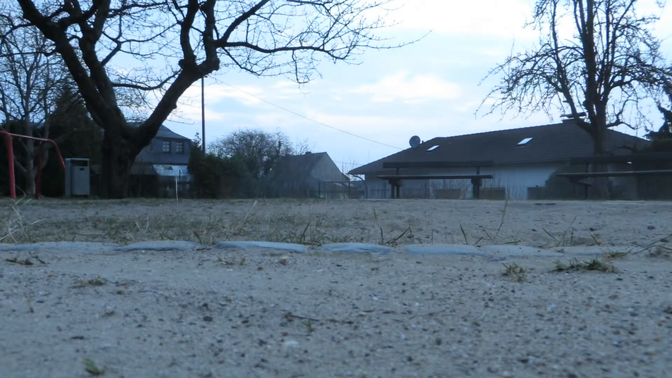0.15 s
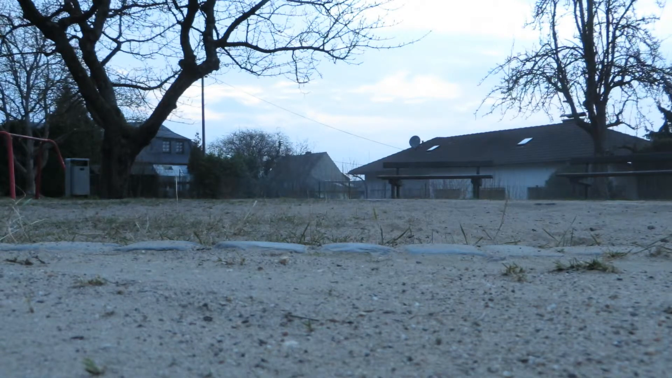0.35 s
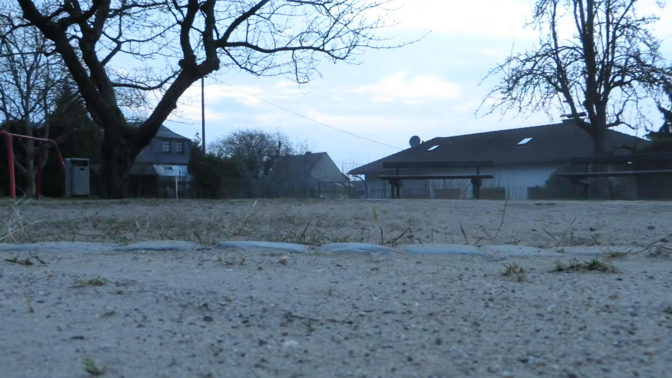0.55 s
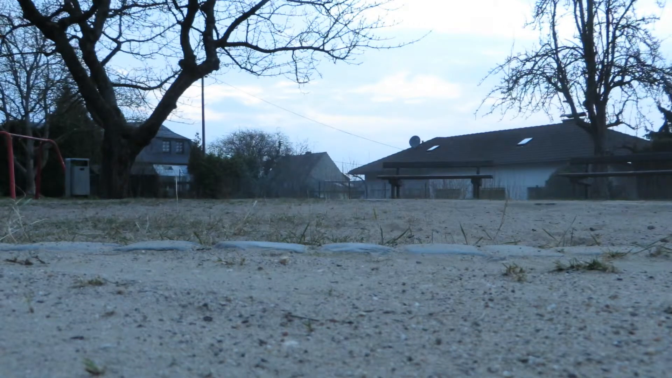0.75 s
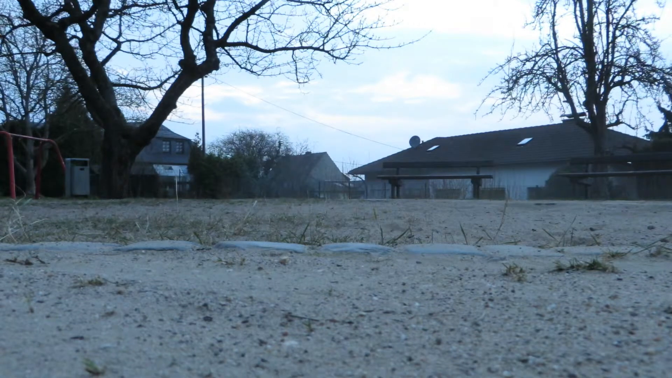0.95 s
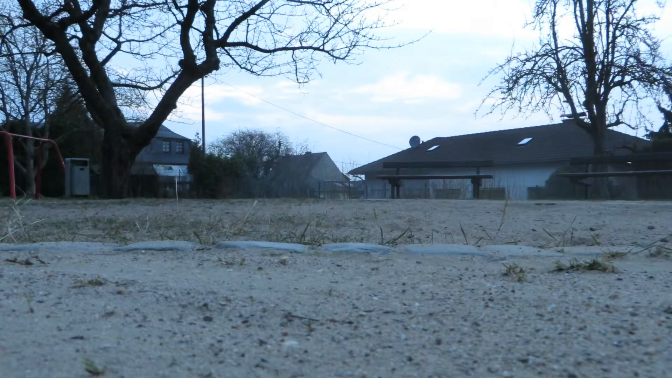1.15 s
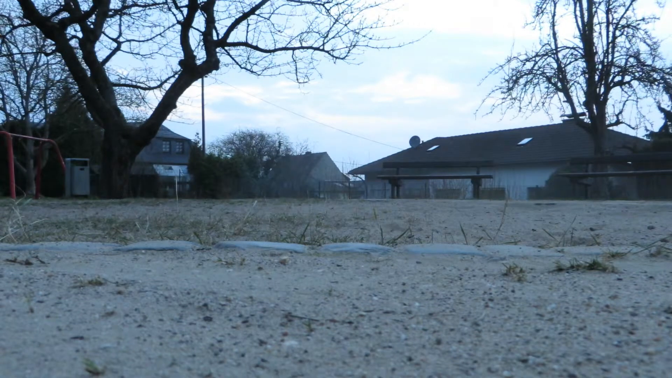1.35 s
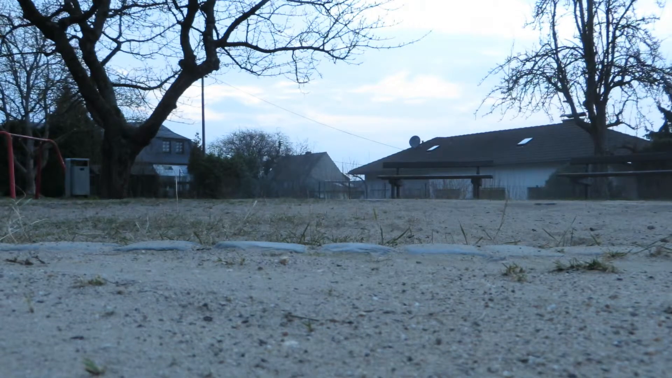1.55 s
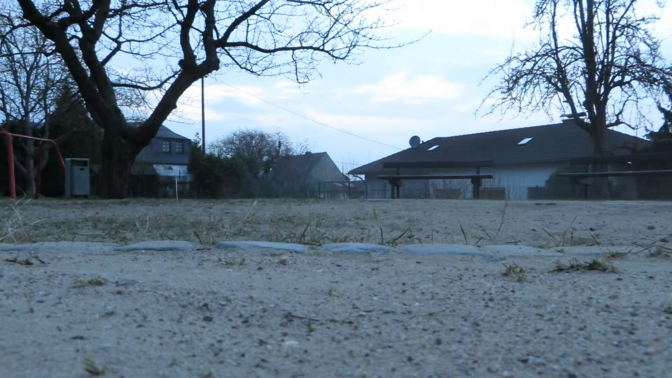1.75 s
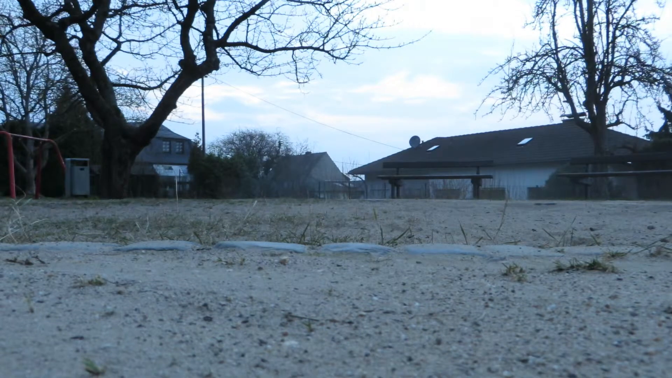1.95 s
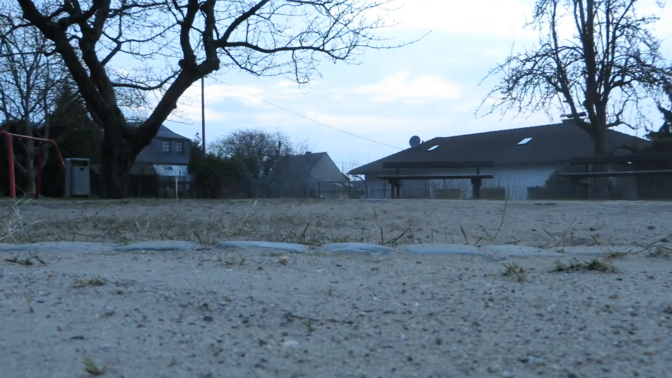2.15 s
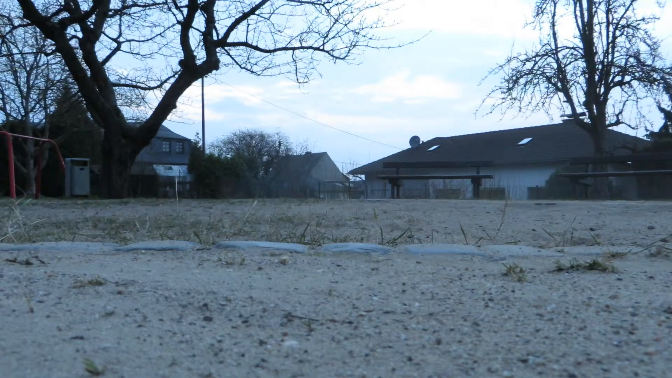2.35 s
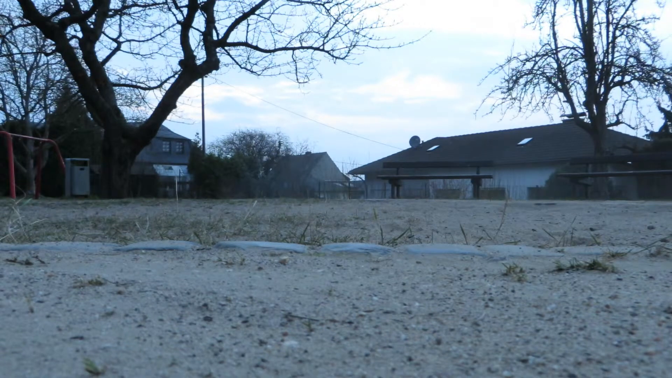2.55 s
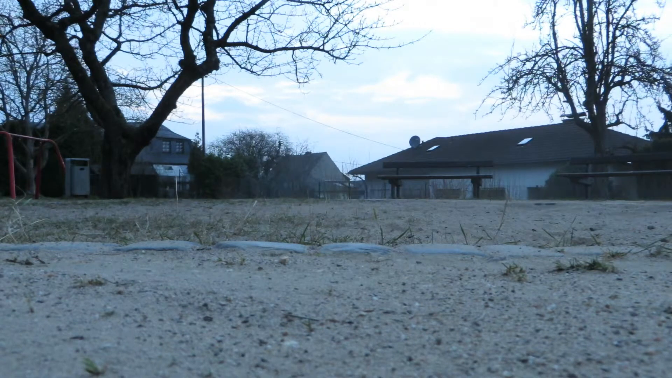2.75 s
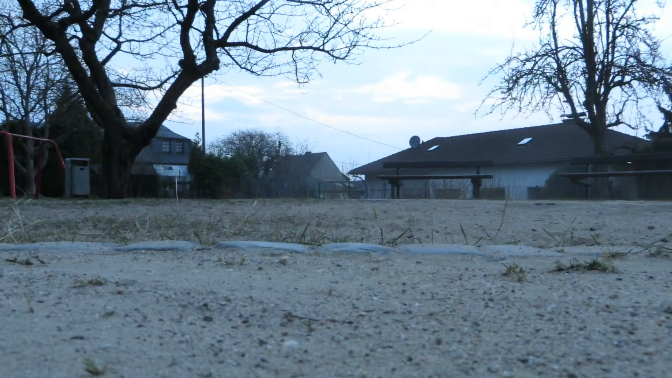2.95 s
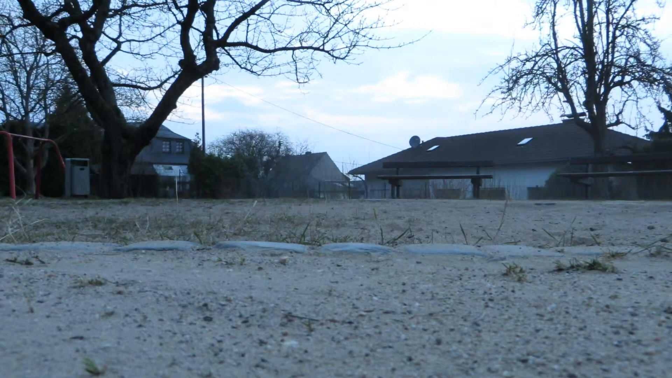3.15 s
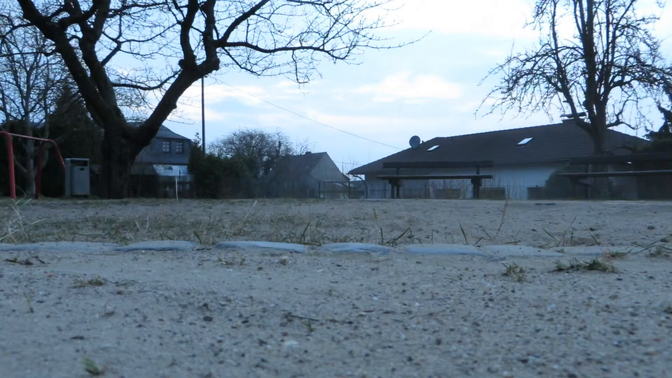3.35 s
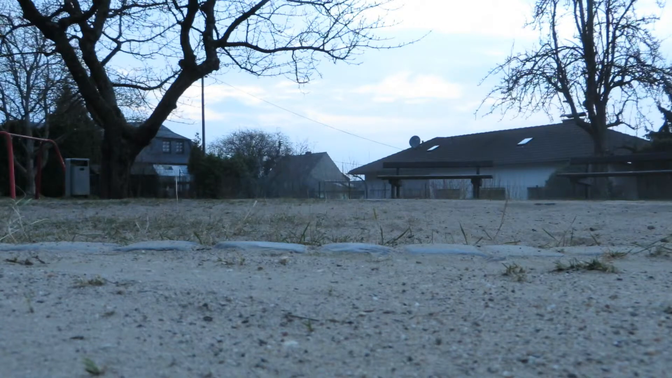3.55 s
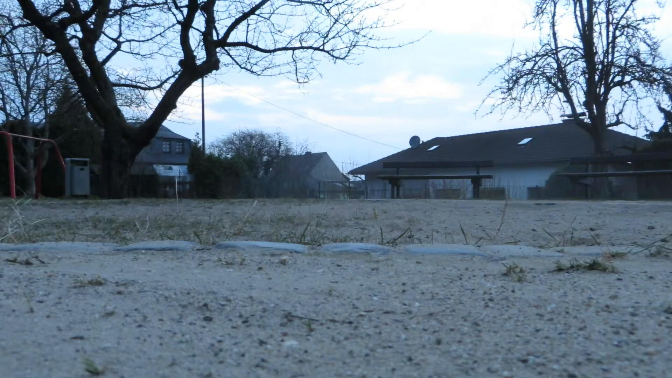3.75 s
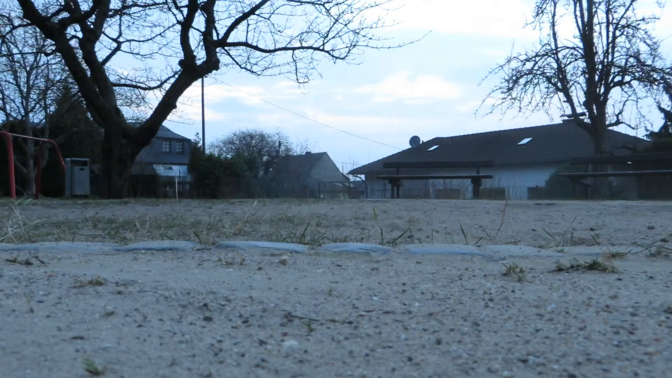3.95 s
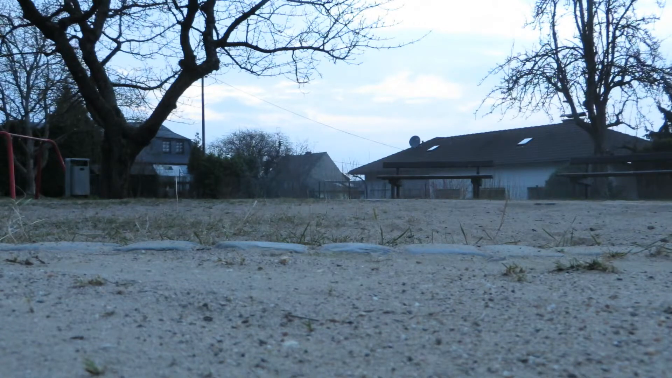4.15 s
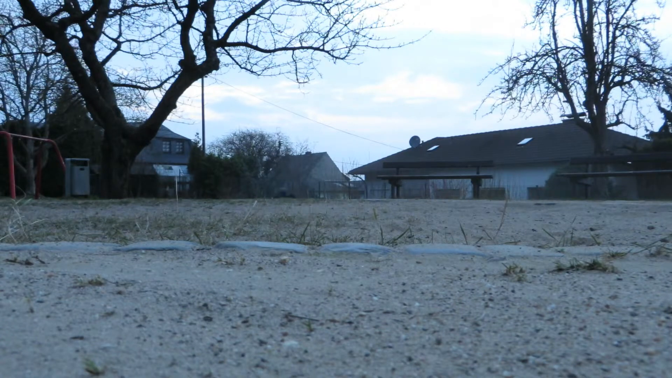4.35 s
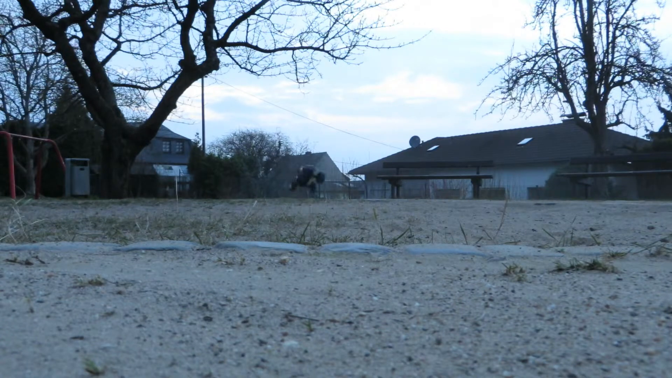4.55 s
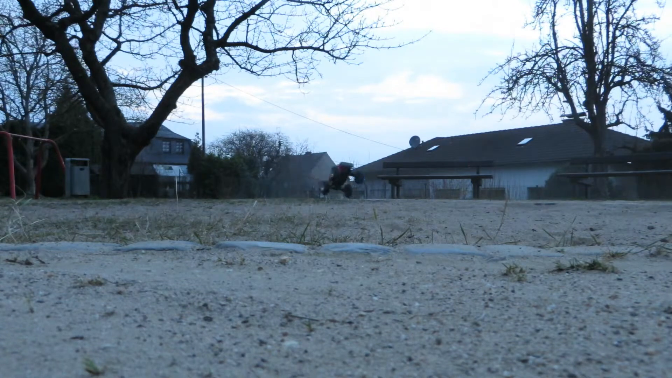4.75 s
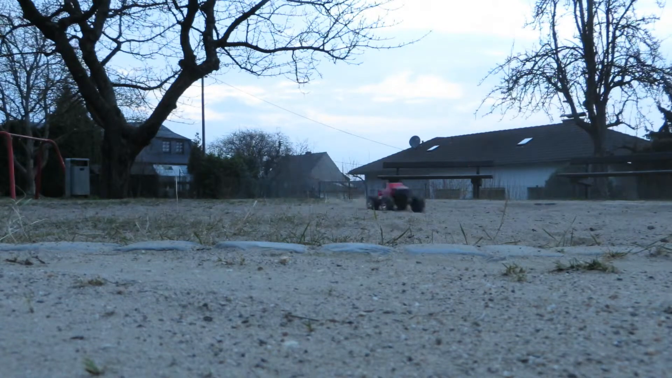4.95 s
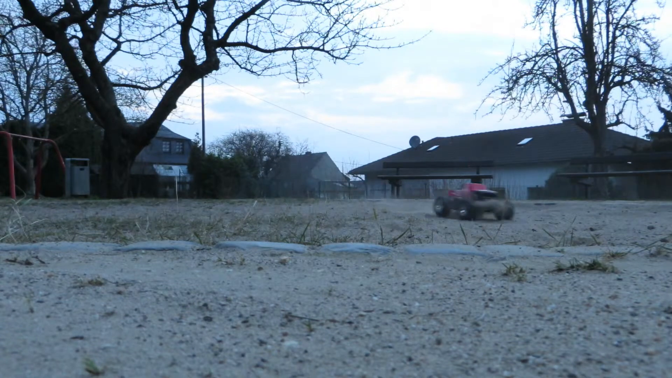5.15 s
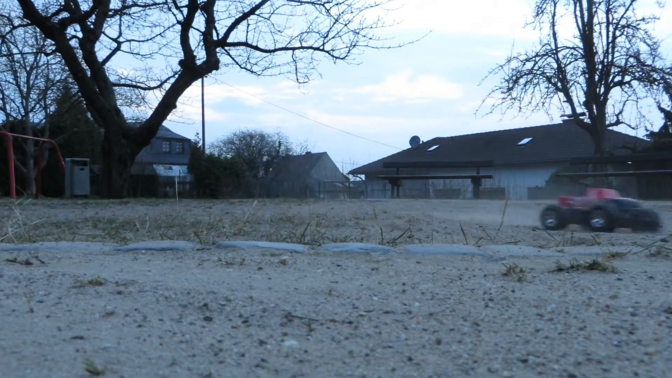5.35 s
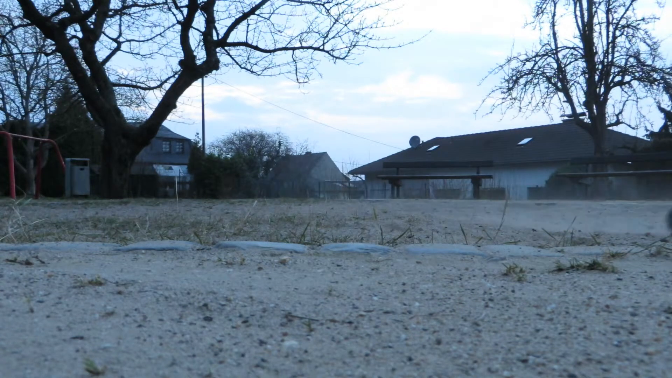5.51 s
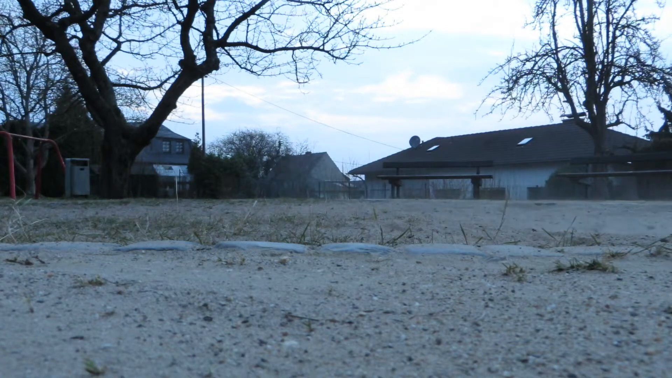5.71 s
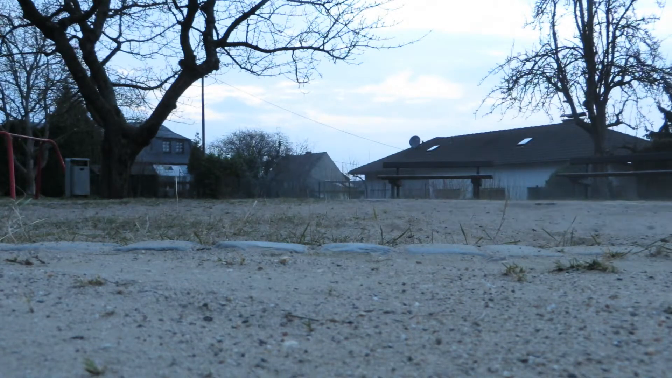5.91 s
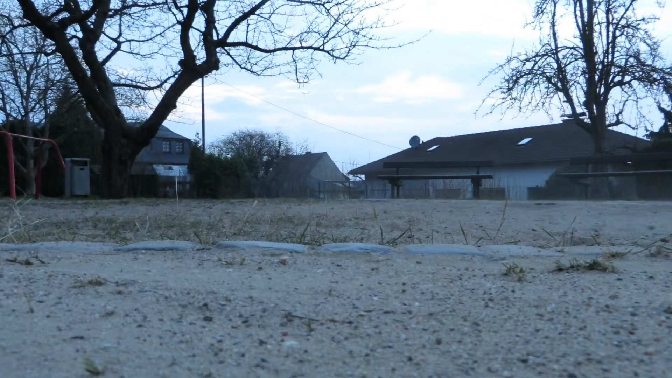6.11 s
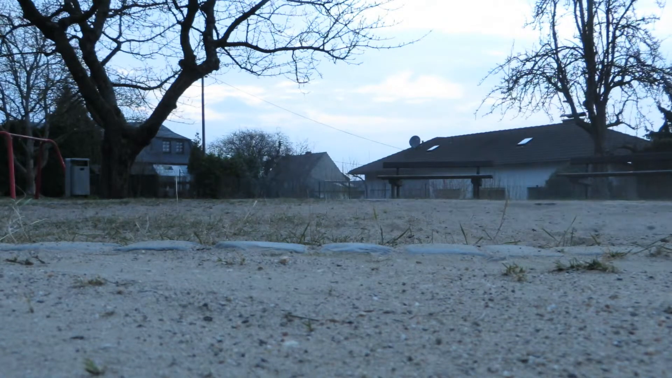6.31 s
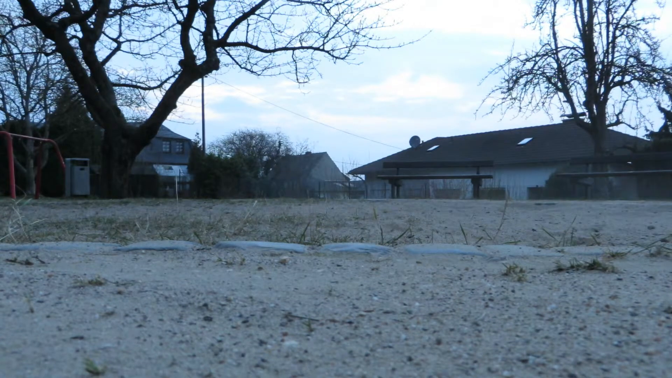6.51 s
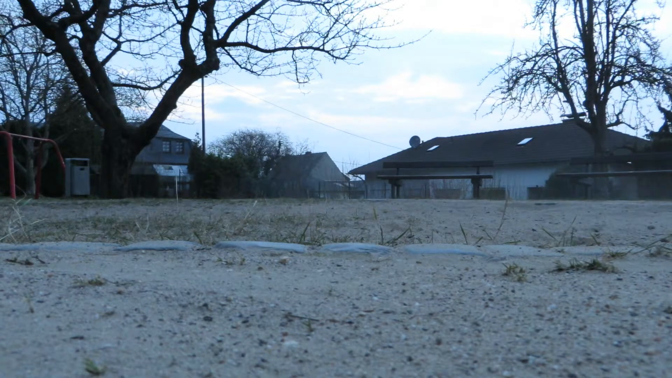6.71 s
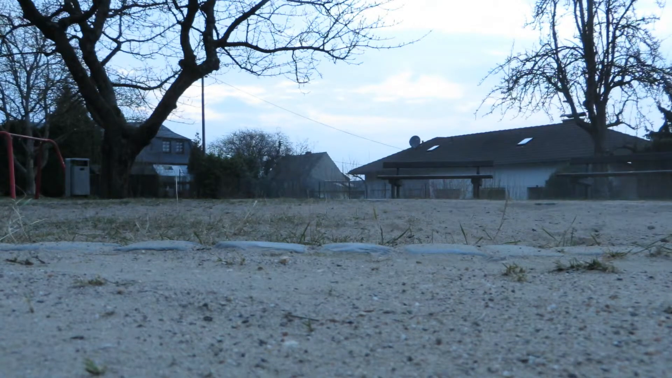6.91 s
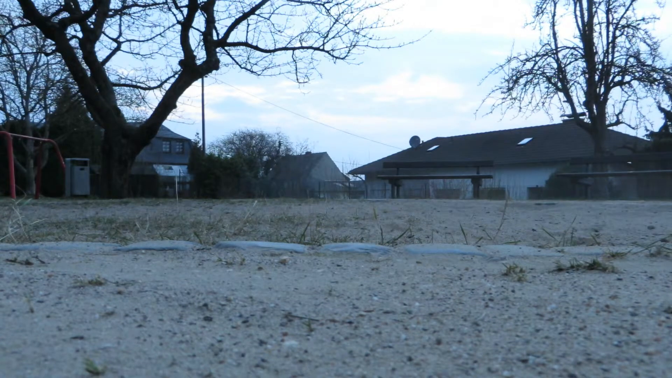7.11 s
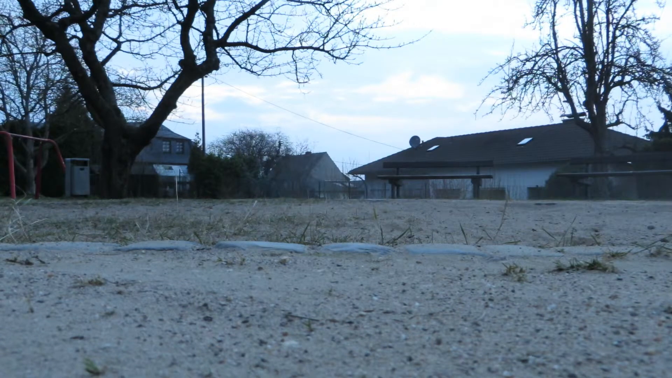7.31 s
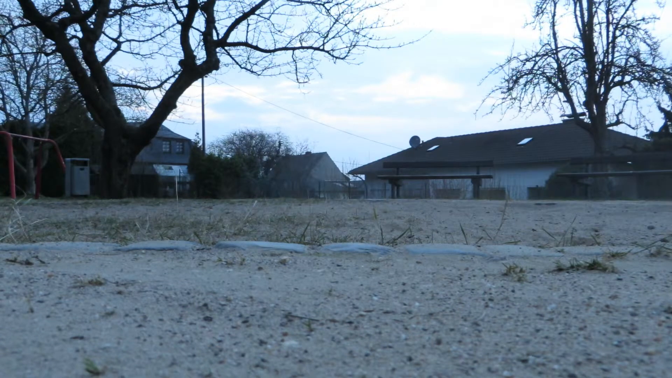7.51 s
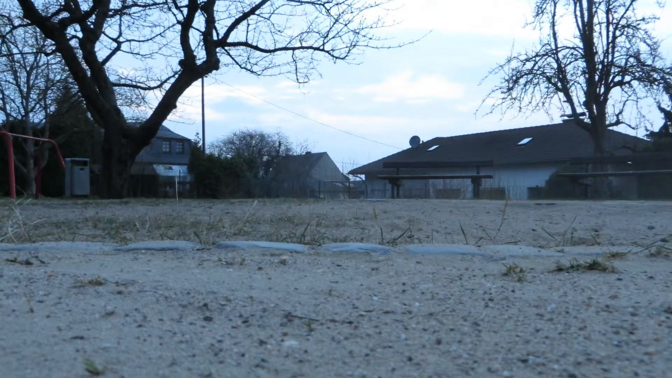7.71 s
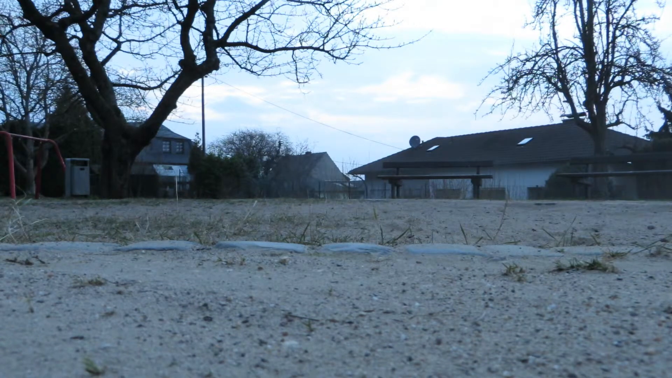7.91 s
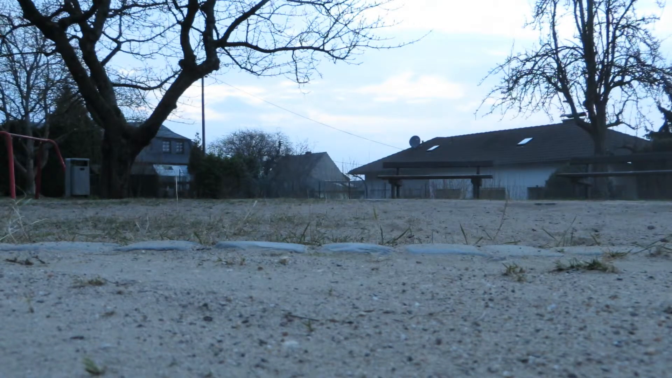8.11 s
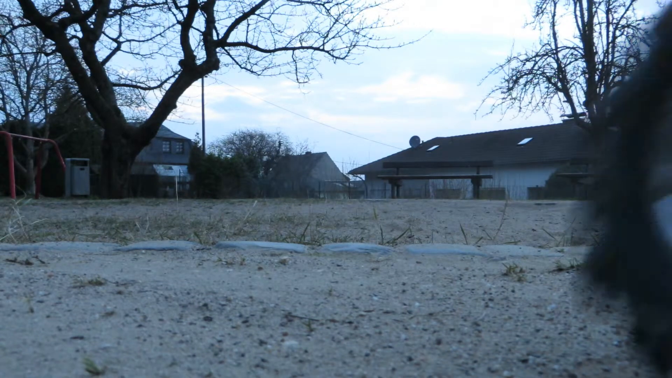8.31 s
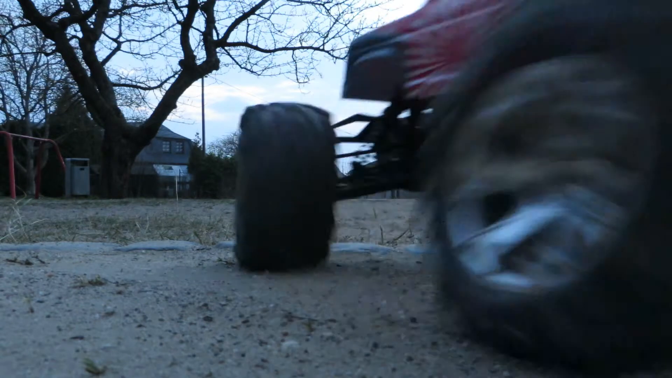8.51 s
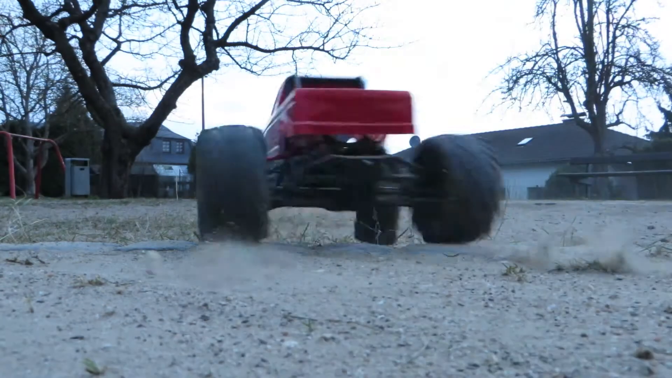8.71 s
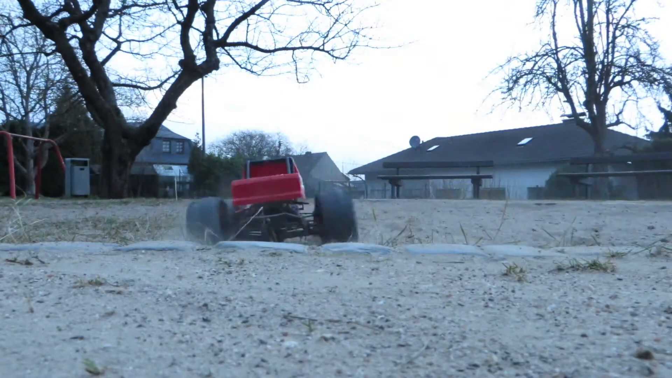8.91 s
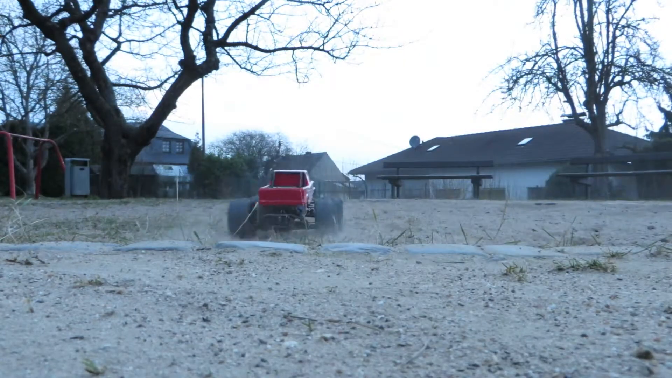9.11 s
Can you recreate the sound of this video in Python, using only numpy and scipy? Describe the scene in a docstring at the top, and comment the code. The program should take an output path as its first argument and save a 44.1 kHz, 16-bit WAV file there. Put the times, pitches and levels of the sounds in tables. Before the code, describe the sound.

A toy truck's electric whine climbs from far off to a brief scream, lands with a thump, rattles round, then launches loudly past over sand.

```python
"""Toy truck in a sandy yard

Microphone pair in a camera on the ground: a radio-controlled truck races in from about 14 m, its gear whine rising.
It leaps with the gears screaming, lands, rattles round behind the camera, then launches past it and away.
Meshing teeth make wavering partials; impacts and noise ring the gear case, shell and motor mount.
Shaped grains give drumming tyres and thrown sand; filtered noise gives distant traffic and faint air."""
import sys
import numpy as np
from scipy import signal
from scipy.fft import rfft, irfft, next_fast_len
from scipy.io import wavfile
from scipy.ndimage import map_coordinates

SR = 44100
rng = np.random.default_rng(int(sys.argv[2]) if len(sys.argv) > 2 else 0)


def to_wav(s):
    """Save 16-bit WAV."""
    ch = np.atleast_2d(s).T  # columns
    pcm = np.round(np.clip(ch, -1, 1) * 32767)  # PCM
    wavfile.write(sys.argv[1], SR, pcm.astype(np.int16))


N = 404397
TOP_HZ = 15850  # upper band limit


def amp(db):
    """Decibels to gain."""
    return 10 ** (np.asarray(db) / 20)


def unit(x):
    """Scale to rms 1."""
    return x / np.sqrt(np.mean(x ** 2) + 1e-20)


def along(points, hz):
    """Read (f/Hz, value) points on a log frequency axis."""
    f, v = np.transpose(points)
    return np.interp(np.log(hz + 1), np.log(f + 1), v)


def curves(rows):
    """One value per sample for each column after the time."""
    s, *cols = np.transpose(rows)
    return [np.interp(np.arange(N) / SR, s, c) for c in cols]


def level(rows):
    """Gain of a (t/s, level/dB) curve, fading quickly outside its span."""
    t = np.arange(N) / SR
    before = np.maximum(rows[0][0] - t, 0)
    after = np.maximum(t - rows[-1][0], 0)
    return amp(curves(rows)[0]) * np.exp(-(before + after) / .03)


def envelope(start, rise, hold, fall_db_per_s, db):
    """Gain that rises, holds and dies away."""
    t = np.arange(N) / SR - start
    fall_db = fall_db_per_s * np.maximum(t - rise - hold, 0)
    return np.clip(t / rise, 0, 1) * amp(db - fall_db)


def together(gains):
    """Independent sounds add in power."""
    return np.sqrt(sum(gain ** 2 for gain in gains))


def noise():
    """White noise."""
    return rng.standard_normal(N)


def wobble(rate):
    """A smooth random curve, rate knots a second."""
    knots = rng.standard_normal(int(N * rate / SR) + 4)
    return map_coordinates(knots, [np.arange(N) * rate / SR])


def grains(rate, spread_db, bed_db):
    """Tiny impacts of scattered size, rate a second, on a bed of countless finer ones."""
    struck = rng.random(N) < rate / SR
    impacts = struck * np.sign(noise()) * amp(spread_db * np.minimum(noise(), 2))
    return unit(unit(impacts) + amp(bed_db) * noise())


def filtered(x, response):
    """x times a complex response of frequency."""
    m = next_fast_len(N + SR // 4)
    spectrum = rfft(x, m) * response(np.fft.rfftfreq(m, 1 / SR))
    return irfft(spectrum, m)[..., :N]


def coloured(x, spectrum):
    """x through a (f/Hz, level/dB) spectrum, at rms 1."""
    return unit(filtered(x, lambda hz: amp(along(spectrum, hz))))


def resonate(x, modes):
    """x through a body's (f/Hz, width/Hz, level/dB) resonances of alternating sign, at rms 1."""
    def body(f):
        total = 0
        for k, (centre, width, db) in enumerate(modes):
            band = 1j * f * width / (centre ** 2 - f ** 2 + 1j * f * width)
            total = total + (-1) ** k * amp(db) * band
        return total
    return unit(filtered(x, body))


# distant traffic spectrum: (f/Hz, relative level/dB per Hz)
TRAFFIC = [(13, -55), (22, -32), (47, -8.5), (146, -5), (204, 1.5), (239, -5), (301, -1), (413, -13),
           (511, -15.5), (714, -21.5), (1350, -47), (1500, -32), (1950, -95), (3300, -120)]
# faint air spectrum: (f/Hz, relative level/dB per Hz)
AIR = [(30, -6), (400, 12.5), (1000, 2.5), (3000, -5.5), (8000, -13), (12000, -49), (15000, -44.5)]
# level of the distant hum about HUM_DB; the hum falls away during the loud launch: (t/s, level/dB)
HUM_LEVEL = [(0, 2), (.6, 0), (1.7, 0), (2.8, 5), (3.4, 1.5), (6, .5), (8, -5), (8.7, -10), (9.17, -8)]
HUM_DB = -38.5  # shared part of the hum, before HUM_LEVEL


def background():
    """Distant traffic, nearly alike at both ports, and a faint airy hiss, from filtered noise."""
    apart = np.array([coloured(noise(), TRAFFIC) for _ in range(2)]) * amp(-13)
    hum = coloured(noise(), TRAFFIC) + apart
    air_apart = np.array([coloured(noise(), AIR) for _ in range(2)])
    air = coloured(noise(), AIR) + amp(8) * air_apart
    hum_gain = amp(HUM_DB + 0.92 * wobble(9.8)) * level(HUM_LEVEL)
    return hum_gain * hum + amp(-53.5) * air


def yard(x, t60):
    """Diffuse scatter from ground, trees and houses, different at each port and renewed every 1/28 s."""
    hop, t = SR // 28, np.arange(SR // 16) / SR
    shape = amp(-60 * t / t60) * (1 - np.exp(-t / 0.00097))
    window = np.sqrt(np.hanning(2 * hop))
    padded, out = np.pad(x, (hop, 2 * hop)), np.zeros((2, N + SR))
    for i in range(0, N + hop, hop):
        tail = rng.standard_normal((2, len(t))) * shape / np.linalg.norm(shape)
        part = signal.fftconvolve((padded[i:i + 2 * hop] * window)[None], tail, axes=1)
        out[:, i:i + part.shape[1]] += part
    return out[:, hop:hop + N]


# the truck's path round the microphones: (t/s, distance/m, bearing: 0 ahead .. 1 far right and behind)
PATH = [(0, 13.7, -0.36), (3.3, 11.3, -0.46), (4.1, 7.5, -0.41), (4.55, 3.5, -0.14), (5.2, 2.1, -0.0075),
        (5.55, 1.22, 0.3), (6.049, 1.43, 0.9), (7.9, 0.91, 0.86), (8.25, 0.68, 1), (8.42, 0.59, 0.53),
        (8.7, 1.19, 0.068), (9.17, 1.8, -0.23)]
# left port's lag for a source far right: (f/Hz, phase/rad)
PORT_PHASE = [(100, 0), (500, 0.5), (3000, 0.57), (4500, 1), (6000, 2), (8000, 3), (10000, 3), (14000, 4)]
# left port over right for a source far right: (f/Hz, level/dB)
PORT_BALANCE = [(200, .5), (1400, -2.5), (3000, -.5), (5200, 3.5), (8000, 0.5), (11000, -4)]


def ports(x):
    """The truck's bearing sets phase and balance between the two microphone ports."""
    hz, t, z = signal.stft(x, SR, nperseg=512)
    s, _, bearings = np.transpose(PATH)
    bearing = np.interp(t, s, bearings)
    sides = np.array([-.5, .5])[:, None, None]
    turn = np.exp(1j * sides * bearing * along(PORT_PHASE, hz)[:, None])
    shade = amp(-sides * bearing * along(PORT_BALANCE, hz)[:, None])
    return signal.istft(z * turn * shade, SR, nperseg=512)[1][:, :N]


TAKEOFF_S, LANDING_S, LIFT_S = 4.52, 4.94, 0.11  # the leap, and how long the wheels take to leave the ground


def airborne():
    """Rises to 1 as the wheels leave the ground for the leap; 0 on the ground."""
    t = np.arange(N) / SR
    return np.clip((t - TAKEOFF_S) / LIFT_S, 0, 1) * (t < LANDING_S)


# the truck's speed over the ground: (t/s, speed/(m/s))
SPEED = [(0, 0.86), (.6, 3), (1.1, 4.2), (3.3, 4.35), (4.5, 5.8), (5.15, 3.6), (5.7, 3.1), (6.2, 2.2),
         (6.45, 1.4), (6.9, 1.77), (7.5, 1.86), (7.8, 0.7), (8.03, 0.36), (8.25, 1), (8.8, 2.02), (9.17, 1)]
NEAR_M = 8.1  # around this distance the ground swallows the separate tyre sounds


def rolling():
    """Rolling noise grows with speed and closeness: its gains as heard from near and from afar."""
    distance = curves(PATH)[0]
    gain = curves(SPEED)[0] / distance
    near = 1 / (1 + (distance / NEAR_M) ** 4)
    on_ground = 1 - airborne()
    return gain * np.sqrt(near) * on_ground, gain * np.clip(distance - 2, 0, 1)


# merged hiss of distant tyres and sand: (f/Hz, relative level/dB per Hz)
FAR_SAND = [(60, -40), (500, -9.5), (1000, -3), (2000, -2), (3800, 0.5), (5200, -3), (6600, -1.5),
            (8500, -4), (11500, -5.5), (12800, -20), (15000, -52)]
HISS_DB = -34.5  # for speed in m/s over distance in m, on the ground; silent within 2 m
FLIGHT_HISS_DB = 8.5  # added in the leap: free wheels fling off their sand


def far_tyres():
    """From afar, tyres and flying sand merge into one fine hiss of dense grains."""
    specks = grains(rate=6000, spread_db=5.5, bed_db=0.0) * amp(0.97 * wobble(50))
    return amp(HISS_DB + FLIGHT_HISS_DB * airborne()) * rolling()[1] * coloured(specks, FAR_SAND)


# tyres drumming on the ground: (f/Hz, relative level/dB per Hz)
DRUM = [(20, -46), (45, -18), (90, -4), (200, 0.5), (350, -2), (600, 1), (900, -3.5), (1400, -7),
        (3000, -58)]
# tyres scraping over grit: (f/Hz, relative level/dB per Hz)
SCRAPE = [(100, -64), (1500, -3.5), (2700, -2.5), (3400, -0.5), (4500, -4.5), (5400, -5.5), (6300, -6.5),
          (7500, -9.5), (12000, -43)]
# thrown sand: (f/Hz, relative level/dB per Hz)
SAND = [(200, -64), (2500, -1), (5500, -1.5), (7500, 3), (10000, 4), (11800, 3.5), (12800, -8),
        (14200, -19.5), (15800, -54)]
# tyres flatten on the take-off bump and on landing: (start t/s, rise/s, hold/s, fall/(dB/s), level/dB)
THUDS = [(4.207, 0.058, 0.44, 195, -36), (4.928, .015, 0.047, 200, -26)]
# tyres slip and throw sand:
# (start t/s, rise/s, hold/s, fall/(dB/s), scrape level/dB, sand level/dB before shade and trim)
SKIDS = [(3.41, .04, .05, 60, -49, -53), (4.444, 0.077, 0.042, 33, -47, -17),
         (4.932, 0.042, 0.019, 108, -30, -18), (5.175, 0.057, 0.048, 47, -31, -23),
         (5.702, 0.19, 0.024, 63, -42, -24.5), (6.79, 0.067, 0.18, 93, -36, -12),
         (7.974, 0.0055, .03, 100, -28, -45), (8.075, 0.11, 0.39, 23.5, -22, -18.5)]
# hollow tyres boom on the take-off bump: (start t/s, rise/s, hold/s, fall/(dB/s), level/dB)
BOOM = (4, 0.5, 0.2, 150, -36)
# air cavity of the tyres: (f/Hz, width/Hz, level/dB)
TYRE_CAVITY = [(148, 55, 0)]
DRUM_DB, SCRAPE_DB, SAND_DB = -33, -36.5, -39  # rolling at 1 m/s and 1 m; the sand before shade and trim
SAND_TRIM_DB = -4.5
BEHIND_DB = -19.5  # the camera body shades the sand spray from behind
DRUM_END_S, DRUM_FADE_DB_PER_S = 8.76, 108  # the drumming dies away as the truck pulls off


def tyres():
    """Hollow tyres drum on the ground, scrape over grit and throw up sand: grains shaped by spectrum."""
    drum = coloured(grains(rate=700, spread_db=1.0, bed_db=0.0) * amp(1.1 * wobble(40)), DRUM)
    scrape = coloured(grains(rate=1900, spread_db=5.5, bed_db=1) * amp(2.6 * wobble(60)), SCRAPE)
    sand = coloured(grains(rate=1500, spread_db=6, bed_db=1) * amp(1.8 * wobble(50)), SAND)
    roll = rolling()[0]
    fade_db = DRUM_FADE_DB_PER_S * np.maximum(np.arange(N) / SR - DRUM_END_S, 0)
    shade_db = BEHIND_DB * curves(PATH)[1] ** 4
    drumming = together([amp(DRUM_DB - fade_db) * roll] + [envelope(*row) for row in THUDS])
    scraping = together([amp(SCRAPE_DB) * roll] + [envelope(*shape, db) for *shape, db, _ in SKIDS])
    spraying = together([amp(SAND_DB) * roll] + [envelope(*shape, db) for *shape, _, db in SKIDS])
    boom = envelope(*BOOM) * resonate(noise(), TYRE_CAVITY)
    spray = amp(shade_db + SAND_TRIM_DB) * spraying * sand
    return drumming * drum + boom + scraping * scrape + spray


# jolts of the truck, each level before its trim in knocks():
# (t/s, clack level/dB, thud level/dB, tick level/dB)
KNOCKS = [(4.965, -16, -19, -13.5), (4.979, -20, -8.5, -33), (4.997, -19, -26, -11.5),
          (5.075, -26, -13, -20), (5.405, -23, -23, -26), (5.53, -13, -13, -19), (5.56, -29, -13, -42),
          (5.707, -14, -10.5, -37), (5.796, -15, -28, -30), (6.013, -16, -26, -25), (6.108, -21, -34, -48),
          (6.47, -15, -30, -29), (6.822, -5.5, -30, -29), (7.198, -8, -31, -27), (7.426, -11, -16, -40),
          (7.795, -19, -40, -49), (7.843, -18, -40, -27), (7.959, -17, -38, -31), (7.98, -10, -21, -21),
          (8.016, -10, -18, -44), (8.119, -16, -15, -46), (8.399, -3, -12, -27), (8.623, -18, -30, -29),
          (8.839, -28, -25, -36)]


def bursts(column, t60):
    """Gain that jumps at each knock to the level in that column and dies away."""
    gain, t = np.zeros(N + SR), np.arange(SR // 4) / SR
    for row in KNOCKS:
        gain[round(row[0] * SR):][:len(t)] += amp(row[column] - 60 * t / t60)
    return gain[:N]


# resonances of the drivetrain: (f/Hz, width/Hz, level/dB)
DRIVETRAIN = [(620, 150, -7.5), (984, 250, -6), (1440, 130, 2.5), (2010, 130, -3.5), (2413, 63, -3),
              (3260, 380, -13), (4450, 110, -23)]
# thump of the tyres: (f/Hz, relative level/dB per Hz)
THUD = [(50, -21), (150, -2), (450, 3), (700, 4), (1200, -30), (3000, -56)]


def knocks():
    """Each jolt clacks the drivetrain, thumps the tyres and ticks with grit."""
    struck = unit(resonate(noise(), DRIVETRAIN) + amp(-15) * resonate(noise(), CHASSIS))
    clack = bursts(1, t60=0.056) * struck
    thud = bursts(2, t60=0.1) * coloured(noise(), THUD)
    tick = bursts(3, t60=0.036) * coloured(noise(), SAND)
    return amp(-5) * clack + amp(-7.5) * thud + amp(2.0) * tick


# resonances of the plastic shell and suspension: (f/Hz, width/Hz, level/dB)
CHASSIS = [(1310, 350, -3), (1720, 148, 4), (2050, 177, 0.5), (2576, 97, 1), (3040, 310, -11.5)]
# rough ground shakes the shell: (start t/s, hold/s, level/dB)
SHAKES = [(3.42, 0.15, -44.5), (5.742, 0.022, -21.5), (5.794, 0.0097, -20), (5.858, 0.03, -24),
          (5.935, 0.025, -22.5), (6.01, 0.012, -22), (6.06, .02, -26), (6.09, 0.027, -20),
          (6.193, 0.057, -25), (6.288, 0.073, -29), (6.518, 0.48, -28), (6.99, 0.44, -26),
          (8.705, 0.46, -37)]
SHAKE_RISE_S, SHAKE_FALL_DB_PER_S = 0.0038, 260
RATTLE_DB = -39.5  # rolling at 1 m/s and 1 m


def chassis():
    """Bumps shake the plastic shell and suspension in a fine irregular rattle."""
    shaking = grains(rate=1200, spread_db=3, bed_db=-3) * amp(1.5 * wobble(110))
    shakes = [envelope(s, SHAKE_RISE_S, hold, SHAKE_FALL_DB_PER_S, db) for s, hold, db in SHAKES]
    return together([amp(RATTLE_DB) * rolling()[0], *shakes]) * resonate(shaking, CHASSIS)


# loose gears grind behind the camera and as the truck pulls away:
# (start t/s, rise/s, hold/s, fall/(dB/s), level/dB)
GRINDS = [(6.39, 0.46, 0.68, 61, -22.5), (8.783, 0.063, 0.37, 30, -35)]


def grind():
    """Loose teeth hammer the drivetrain."""
    teeth = grains(rate=1800, spread_db=1.5, bed_db=-4.0) * amp(2.8 * wobble(130))
    return together(envelope(*row) for row in GRINDS) * resonate(teeth, DRIVETRAIN)


# the motor strains as it brakes, then jerks, judders and catches from standstill:
# (start t/s, rise/s, hold/s, fall/(dB/s), level/dB)
JERKS = [(7.3, .1, 0.24, 55, -31), (7.978, 0.0014, 0.013, 300, -12), (8.004, .005, 0.0087, 900, -11),
         (8.027, .004, .05, 62, -18.5), (8.096, .004, .009, 500, -13), (8.112, .005, 0.068, 32, -22)]
# resonances of the motor mount: (f/Hz, width/Hz, level/dB)
MOTOR_MOUNT = [(583, 76, -6.5), (1160, 290, -5.5), (1448, 120, 1.5), (1980, 170, -8.5), (2780, 300, -13.5),
               (3700, 690, -21), (4400, 150, -14.5)]


def restart():
    """Braking or stalled, the motor hammers its mount, with a few hard jerks before it runs freely."""
    hammering = grains(rate=1800, spread_db=1.5, bed_db=-4.5)
    ring = unit(np.tanh(resonate(hammering, MOTOR_MOUNT) / 2))  # the mount gives only so far
    return together(envelope(*row) for row in JERKS) * ring


# resonances of the gear case: (f/Hz, width/Hz, level/dB)
GEARBOX = [(496, 48, -2), (980, 26, -2.5), (1416, 98, 0), (2126, 150, 2), (2916, 105, 2.5), (3530, 110, 0),
           (4450, 290, 2), (5450, 140, 3), (6050, 310, 0), (6700, 210, -3.5), (9900, 400, -22),
           (10670, 250, -7), (11000, 64, -16), (12540, 33, -31.5)]
# the gears scream during the leap: (start t/s, rise/s, hold/s, fall/(dB/s), level/dB)
SCREAM = (4.5, 0.1345, 0.34, 130, -21)
WHINE_CASE_DB = -8  # the case rings along under the distant whine, relative to its level curve
CASE_DRIFT = .016  # relative wander of the case's pitches


def gearbox():
    """Tooth impacts ring the gear case, up to a scream when the truck is in the air; its pitches waver."""
    teeth = grains(rate=5000, spread_db=3, bed_db=-2) * amp(1.3 * wobble(70))
    wavering = np.cumsum(1 + CASE_DRIFT * wobble(40))  # uneven reading position, in samples
    ring = map_coordinates(resonate(teeth, GEARBOX), [wavering], mode="mirror")
    return together([envelope(*SCREAM), amp(WHINE_CASE_DB) * level(FAR_LEVEL)]) * ring


CHOPPER_DB = -9.5  # the speed controller sings under the whine, relative to the drive
FULL_THROTTLE_HZ = 2300  # mesh pitch at which it stops chopping on the launch


def controller(chop_hz):
    """The chopped motor current makes the windings sing fitfully near one pitch, at part throttle only."""
    tone = np.sin(2 * np.pi * chop_hz * np.arange(N) / SR + 2.6 * wobble(260))
    part_throttle = np.clip(2 * (1 - mesh_hz(LAUNCH_PITCH) / FULL_THROTTLE_HZ), 0, 1)
    turn_current = amp(-3) * throttle(TURN_PITCH) * envelope(*TURN)
    current = turn_current + part_throttle * level(LAUNCH_LEVEL)
    fitful = amp(5 * np.tanh(wobble(22)) + 3 * wobble(90))
    return amp(CHOPPER_DB) * current * unit(tone * fitful)


# bouncing tyres grip and drag the motor down for a moment: (t/s, share of speed lost)
GRIPS = [(6.581, .17), (6.69, 0.081), (6.835, .11), (6.985, 0.1), (8.24, .12), (8.39, .11), (8.505, .12),
         (8.605, .11), (8.689, .1), (8.811, 0.097), (8.9, 0.12), (9.069, 0.053)]
GRIP_S = .045  # time to sag, and to recover


def mesh_hz(pitch):
    """The gear mesh follows the throttle and sags wherever the tyres grip."""
    t = np.arange(N) / SR
    sag = sum(share * np.maximum(1 - np.abs(t - s) / GRIP_S, 0) for s, share in GRIPS)
    return curves(pitch)[0] * (1 - sag)


def throttle(pitch):
    """1 while the throttle is pulled; the drive lets go quickly afterwards."""
    return level([(pitch[0][0], 0), (pitch[-1][0], 0)])


# bumps unload the gears and the whine breaks up: (t/s, half length/s)
SLACK = [(6.83, 0.015), (6.97, 0.0061), (8.376, 0.01), (8.942, 0.029)]
CHATTER_SHARE = .03  # always broken up


def backlash():
    """Share of the whine that is broken into chatter: a little always, nearly all when the teeth go slack."""
    t = np.arange(N) / SR
    slack = sum(np.exp(-((t - s) / half) ** 4) for s, half in SLACK)
    return np.clip(CHATTER_SHARE + slack, 0, .95)


# how strongly the truck radiates each frequency of the whine: (f/Hz, level/dB)
RADIATION = [(300, -16), (600, 2.5), (1200, 1), (1900, -1.5), (2200, -0.5), (2450, 0.5), (2800, -0.5),
             (3600, 2.5), (4000, 1.5), (4500, 2.5), (5000, -3), (5500, -7.5), (5800, -5.5), (6200, -6),
             (6800, -24), (12000, -4)]
# slow gears rattle in their backlash and smear the overtones; fast ones run truer:
# (mesh f/Hz, extra blur factor)
LOOSENESS = [(1200, 2.2), (1500, 1.25), (2500, 1)]
HARD_BITE_LOSS = 0.62  # dB given up by the mesh tone, and any below it, per dB of hard bite
SLACK_DB = -3  # drop of the whine for wholly slack teeth
CHATTER_RATE = 700  # random knots a second


def whine(pitch, strength, orders, bite, waver, blur, smear_hz, flutter_db):
    """Meshing teeth: the speed wavers with the ground, and backlash smears the higher partials most."""
    steady = mesh_hz(pitch)
    hz = steady * (1 + waver * wobble(220))
    phase = 2 * np.pi * np.cumsum(hz) / SR
    bite_db = along(bite, steady)
    tone = np.zeros(N)
    for multiple, db in orders:
        loose = blur * max(multiple, 1 / multiple) ** .4
        lift_db = -HARD_BITE_LOSS * np.maximum(bite_db, 0)
        if multiple > 1:
            loose = loose * along(LOOSENESS, steady)
            lift_db = bite_db
        rate = smear_hz * max(multiple, 1) ** .5
        smear = (1 + loose * (wobble(rate) + 1j * wobble(rate))) / np.sqrt(.5 + loose ** 2)
        in_band = multiple * hz < TOP_HZ
        gain = amp(db + along(RADIATION, multiple * hz) + lift_db) * in_band
        tone += gain * np.real(smear * np.exp(1j * multiple * phase))
    slack = backlash()
    chatter = np.sqrt(1 - slack) + np.sqrt(slack) * wobble(CHATTER_RATE)
    flutter = amp(SLACK_DB * slack + flutter_db * wobble(45))
    return tone * chatter * throttle(pitch) * strength * flutter


# gear mesh on the three pulls of the throttle, before the grips' sag: (t/s, f/Hz)
FAR_PITCH = [(.16, 941), (.45, 1330), (.85, 1600), (1.1, 1830), (1.65, 2202), (1.95, 2720), (2.12, 3235),
             (2.5, 3566), (3.2, 3765), (3.75, 4400), (4.1, 4520), (4.2, 4880), (4.31, 5170), (4.36, 5660),
             (4.42, 5560), (4.475, 5680), (4.52, 6150), (4.58, 6320)]
TURN_PITCH = [(6.535, 1080), (6.64, 1057), (6.77, 1170), (6.87, 1190), (6.915, 1245), (7.03, 1120),
              (7.075, 965), (7.09, 955)]
LAUNCH_PITCH = [(8.09, 560), (8.12, 680), (8.16, 934), (8.33, 1109), (8.47, 1624), (8.56, 1880),
                (8.655, 2260), (8.77, 2480), (8.87, 2816), (8.95, 2730), (9.0, 2435), (9.06, 2502),
                (9.1, 2630), (9.17, 2665)]
# wheels spinning free off a bump: (t/s, f/Hz)
FREE_SPIN = [(1.11, 4550), (1.18, 4920), (1.25, 5260)]
# one strand of the whine holds its pitch into the leap: (t/s, f/Hz)
HELD_PITCH = [(4.44, 5620), (4.52, 5700), (4.66, 5560)]
# drive level of the whine on the distant pull and on the launch: (t/s, level/dB)
FAR_LEVEL = [(.18, -43), (.4, -48), (.9, -49), (1.15, -44.5), (1.8, -48), (2.1, -54), (3.4, -54.5),
             (3.8, -56.5), (4.15, -47), (4.37, -34.5), (4.52, -27.5), (4.58, -24)]
LAUNCH_LEVEL = [(8.09, -25), (8.15, -20), (8.35, -20.5), (8.48, -19), (8.62, -21.5), (8.8, -20), (8.9, -21),
                (8.97, -28.5), (9.17, -30)]
# drive of the free spin, the turn behind the camera and the held strand:
# (start t/s, rise/s, hold/s, fall/(dB/s), level/dB)
SPIN = (1.11, .03, .11, 300, -42.5)
TURN = (6.53, .025, .535, 400, -22)
HELD = (4.44, .07, .14, 200, -27)
# partials of the gear train, with rough side tones from the turn onwards: (multiple of mesh f, level/dB)
FAR_ORDERS = [(1, 1.5), (2, -4.5), (3, -10)]
TURN_ORDERS = [(.5, -14), (1, 0), (1.8, -9.5), (2, -9), (2.75, -17), (3, -14), (4, -21)]
LAUNCH_ORDERS = [(.5, -12), (1, 0), (2, -5), (2.35, -14), (2.8, -8), (3, -6), (3.5, -8), (4, -5),
                 (4.5, -10), (5, -13)]
# teeth bite hardest where the motor pulls hardest, which lifts their overtones: (mesh f/Hz, level/dB)
BITE = [(500, -15), (1050, -0.5), (1500, 3), (1850, 2.5), (2250, -4), (2700, -18)]
# overtones of the distant pull fade as the truck gets up to speed: (mesh f/Hz, level/dB)
FAR_BITE = [(950, 0), (1500, 0), (1800, -3), (2200, -9), (3500, -12)]
# a tone an octave below the mesh comes in at high speed: (mesh f/Hz, level/dB)
HALF_TONE = [(3300, -12), (3600, 0), (3720, 4), (4000, 1), (4450, 4.5), (4900, -4), (5300, -6), (5560, -2),
             (5750, -8), (6000, -15)]
# sound grazing the ground from afar: (f/Hz, level/dB)
GROUND_DIP = [(500, -21), (1100, -10.5), (1800, 0), (3500, -0.5), (6500, 3), (9000, -13)]
# further rings of the gear case: (f/Hz, width/Hz, level/dB)
FAR_CASE = [(4250, 300, 0), (5220, 150, -7)]
# the gear case rings as the distant truck gathers speed: (start t/s, rise/s, hold/s, fall/(dB/s), level/dB)
FAR_CASE_RING = (.15, .2, .95, 12, -52.5)


def motor():
    """Three pulls of the throttle and a short free spin of the wheels; distance blurs the first pull."""
    distant, blur = level(FAR_LEVEL), .6 + .22 * curves(PATH)[0]
    far = whine(FAR_PITCH, distant, FAR_ORDERS, FAR_BITE,
                waver=.012, blur=blur, smear_hz=270, flutter_db=2.5)
    half_gain = amp(along(HALF_TONE, mesh_hz(FAR_PITCH)))
    far += whine(FAR_PITCH, distant * half_gain, [(.5, 0)], FAR_BITE,
                 waver=.012, blur=blur, smear_hz=170, flutter_db=2.5)
    far = filtered(far, lambda hz: amp(along(GROUND_DIP, hz)))
    spin = whine(FREE_SPIN, envelope(*SPIN), [(1, 0)], FAR_BITE,
                 waver=.003, blur=.35, smear_hz=197, flutter_db=1.5)
    held = whine(HELD_PITCH, envelope(*HELD), [(1, 0)], FAR_BITE,
                 waver=.01, blur=1.2, smear_hz=260, flutter_db=2)
    turn = whine(TURN_PITCH, envelope(*TURN), TURN_ORDERS, BITE,
                 waver=.014, blur=.32, smear_hz=240, flutter_db=1.3)
    launch = whine(LAUNCH_PITCH, level(LAUNCH_LEVEL), LAUNCH_ORDERS, BITE,
                   waver=.014, blur=.31, smear_hz=250, flutter_db=1.1)
    case_ring = envelope(*FAR_CASE_RING) * resonate(noise(), FAR_CASE) * amp(2 * wobble(20))
    return far + spin + held + turn + launch + case_ring


# diffuse share for a truck 1 m away: (f/Hz, level/dB)
SCATTER = [(100, -16), (3000, -42.5), (7000, -11), (11000, -18)]


def scene():
    """The truck in its yard; the gritty ground scatters treble most, and more so from afar."""
    on_ground = far_tyres() + tyres() + knocks() + chassis()
    drive = grind() + restart() + gearbox() + controller(chop_hz=8150) + motor()
    truck = on_ground + drive
    farther_wetter = truck * np.sqrt(curves(PATH)[0])
    scattered = filtered(farther_wetter, lambda hz: amp(along(SCATTER, hz)))
    return background() + yard(scattered, t60=0.026) + ports(truck)


CEILING = .95  # full scale is 1


def record(dry):
    """The camera rounds off the loudest peaks and keeps nothing above its band limit."""
    rounded = dry / (1 + (dry / CEILING) ** 8) ** (1 / 8)
    return filtered(rounded, lambda hz: hz < TOP_HZ)


dry = scene()
out = record(dry)
to_wav(out)
```